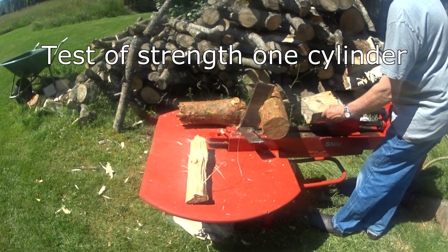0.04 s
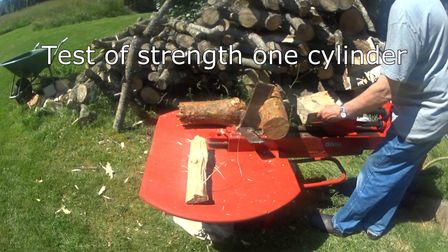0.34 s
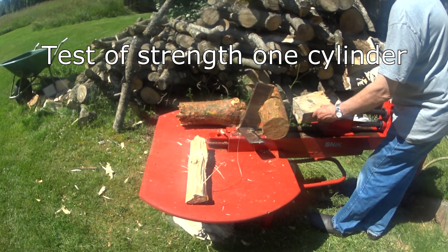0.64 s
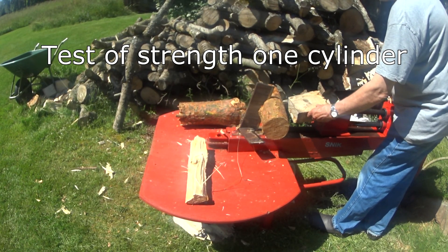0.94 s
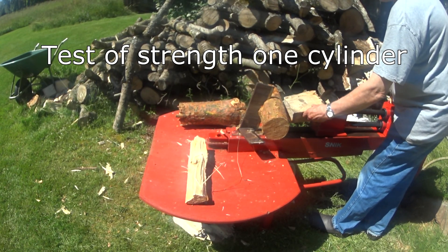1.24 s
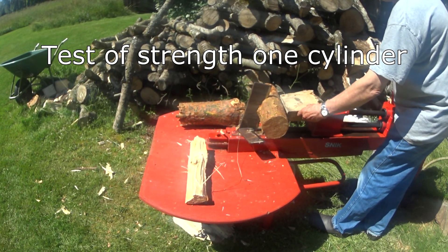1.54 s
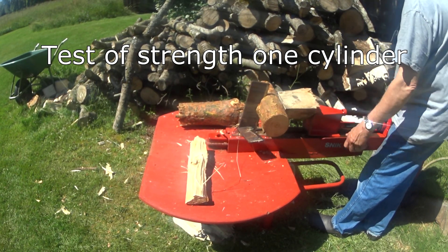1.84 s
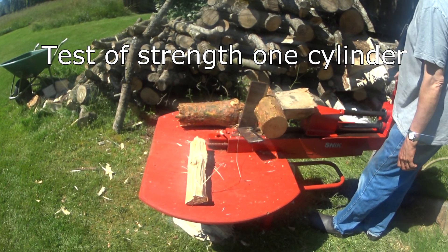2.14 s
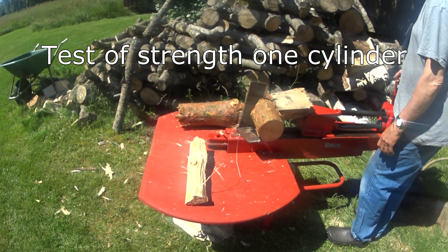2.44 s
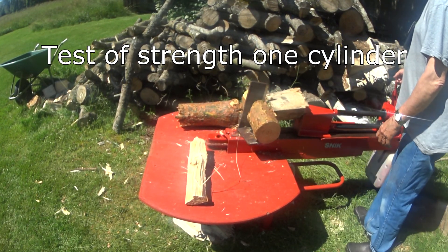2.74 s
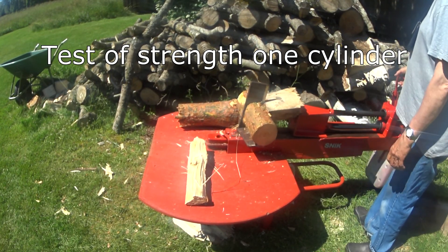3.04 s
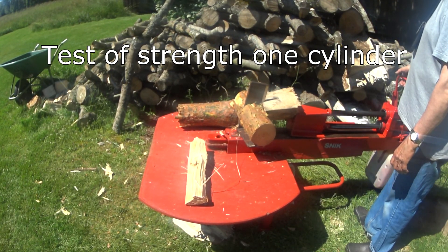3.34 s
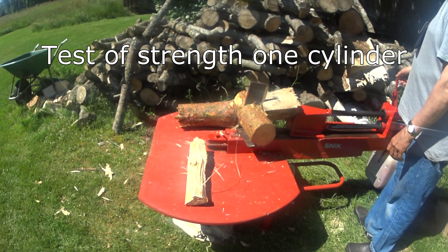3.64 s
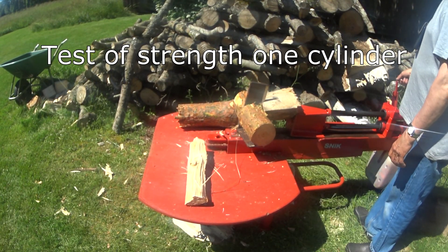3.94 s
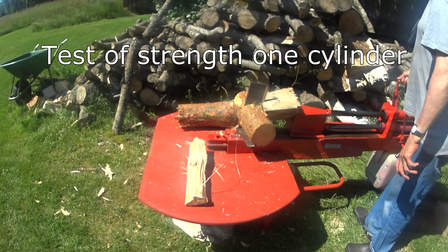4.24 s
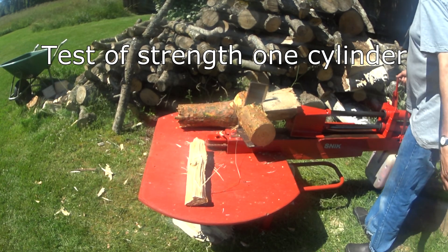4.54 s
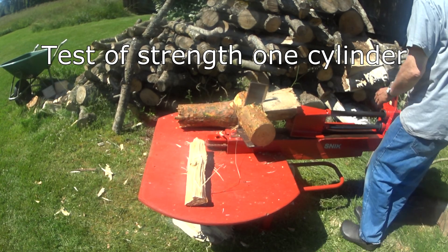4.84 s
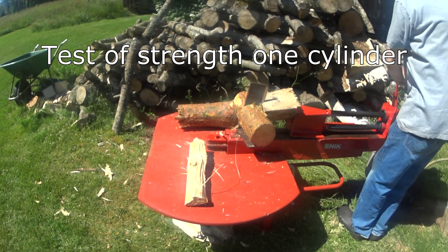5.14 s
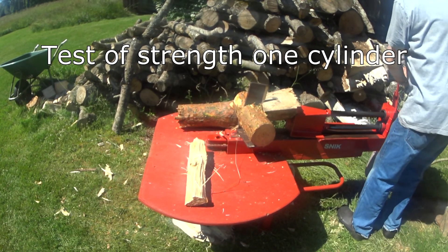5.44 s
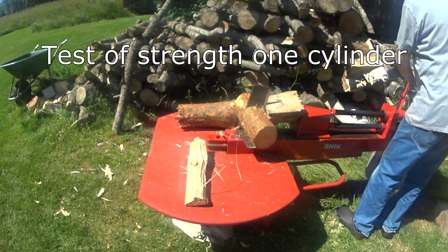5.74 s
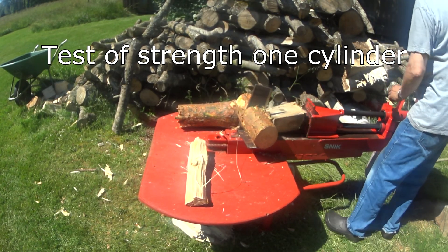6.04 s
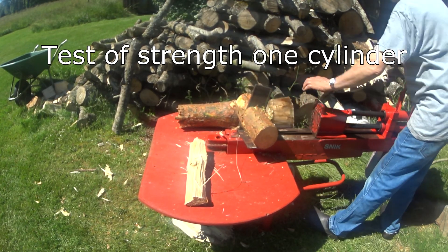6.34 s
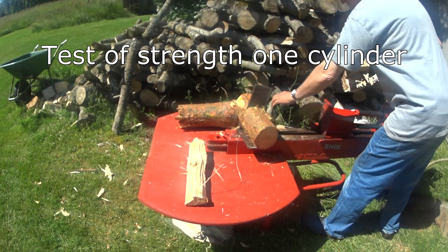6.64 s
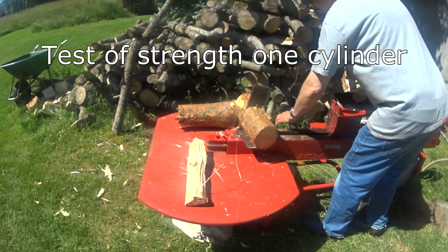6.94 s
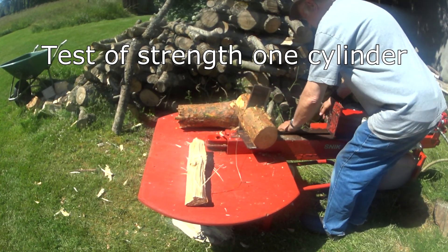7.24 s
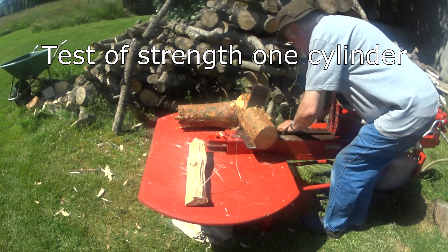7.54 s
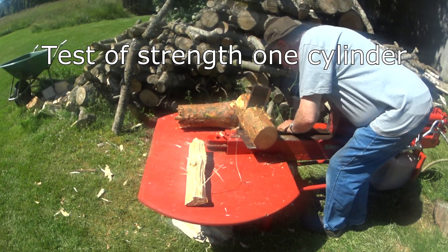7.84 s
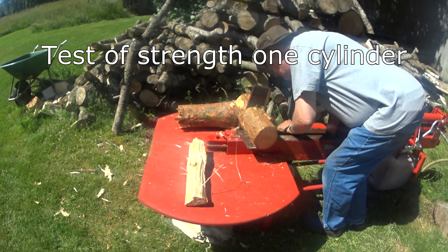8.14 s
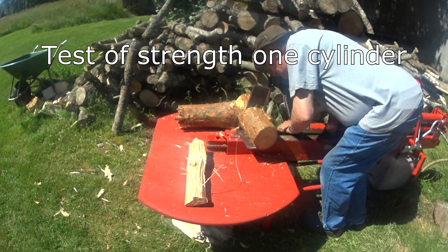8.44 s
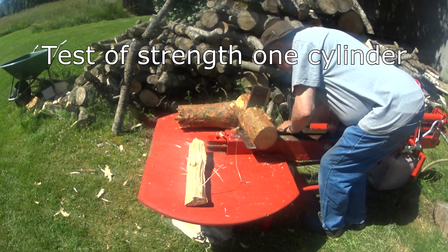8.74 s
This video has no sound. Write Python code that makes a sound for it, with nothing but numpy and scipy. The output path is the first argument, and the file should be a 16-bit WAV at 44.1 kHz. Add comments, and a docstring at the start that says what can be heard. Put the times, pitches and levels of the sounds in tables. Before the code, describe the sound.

A log splitter's motor hums close by in a yard, its valve hissing and whistling. Wood is pressed onto the wedge and its fibres snap in a dense run, then almost stop while the motor labours. The block suddenly cracks open, and the pieces tumble on metal with knocks and one more sharp burst. A stronger hydraulic hiss takes over, with low gusts of wind on the microphone.

```python
"""Hydraulic log splitter on a lawn.

Motor and pump hum; oil hisses and whistles through the valve as the ram pushes a block onto the wedge.
Fibres crackle and tear, the block groans, the ram nearly stalls, then the block bursts open.
The halves tumble on the steel bed and the ram runs back with a louder hiss.
A shoe brushes the grass; wind freshens near the end."""
import sys
import numpy as np
from scipy import signal
from scipy.fft import rfft, irfft, next_fast_len
from scipy.io import wavfile
from scipy.ndimage import map_coordinates

SR = 44100
rng = np.random.default_rng(int(sys.argv[2]) if len(sys.argv) > 2 else 0)


def dump(signal):
    """Clip the signal to [-1, 1] and save it as 16-bit WAV at the path in sys.argv[1]."""
    limited = np.clip(np.atleast_2d(signal).T, -1, 1)
    pcm = np.round(limited * 32767).astype(np.int16)
    wavfile.write(sys.argv[1], SR, pcm)


N = 396900
TIME_S = np.arange(N) / SR
N_FFT = next_fast_len(N + SR // 2, real=True)
FREQS_HZ = np.maximum(np.arange(N_FFT // 2 + 1) * SR / N_FFT, 1)
CONTACT_S, BITE_S, STALL_S, BREAK_S, RETURN_S = 1.613, 2.0, 3.74, 5.7, 7.125

# Levels are relative; spectra are densities.
# loud fractures: t/s, length/s, snap level/dB, body level/dB
FRACTURES = [(1.7565, 0.016, -24.5, -16), (1.826, 0.019, -35, -31), (1.842, 0.024, -34, -16.5),
             (1.864, 0.032, -14.5, -19.5), (1.9, 0.064, -27, -29), (1.9675, 0.014, -19, -18.5),
             (1.9985, 0.0036, -21, -33), (2.033, 0.004, -42, -30.5), (2.072, 0.0015, -24, -29.5),
             (2.131, .002, -33, -35.5), (2.308, .005, -26, -32), (2.3217, 0.0058, -23.5, -29),
             (2.367, 0.0084, -31, -27), (2.395, 0.0098, -24, -35), (2.4855, 0.0085, -26, -29.5),
             (2.531, 0.016, -19, -31.5), (2.556, 0.0054, -21, -30.5), (2.586, .0016, -26.5, -40),
             (2.5965, 0.00092, -22.5, -43), (2.6196, 0.0055, -24, -30), (2.645, 0.016, -25, -32),
             (2.670, 0.013, -19, -24.5), (2.697, 0.005, -29, -34), (2.725, 0.0047, -20, -26.5),
             (2.749, .006, -22, -28), (2.7665, 0.0023, -22.5, -28), (2.7805, 0.006, -18.5, -30),
             (2.8045, 0.0084, -18, -27), (2.8350, 0.006, -19, -22), (2.8614, 0.007, -20, -25),
             (2.888, 0.021, -15, -22.5), (2.9115, 0.012, -19, -27), (2.937, 0.0065, -17.5, -27),
             (2.9967, 0.0053, -22, -24), (3.021, 0.0051, -22, -26.5), (3.0506, 0.004, -27, -25),
             (3.059, 0.0017, -23, -36), (3.082, .003, -25, -28), (3.108, 0.009, -21, -25),
             (3.127, 0.012, -19, -28.5), (3.161, 0.0018, -22, -34), (3.1725, 0.0077, -22, -21),
             (3.1955, 0.0014, -22, -33), (3.2085, 0.0014, -20, -27), (3.218, 0.0028, -24, -27),
             (3.232, 0.0015, -21.5, -31), (3.2625, 0.0016, -24, -32), (3.274, 0.0057, -26, -24),
             (3.311, 0.0031, -20.5, -34), (3.3205, .005, -34, -29), (3.330, .001, -21, -42),
             (3.346, 0.0047, -23, -27), (3.369, .005, -29, -33), (3.3785, 0.0021, -32, -31),
             (3.386, 0.0018, -28, -32), (3.4425, 0.00091, -21.5, -27), (3.4825, 0.0025, -21, -26),
             (3.5296, 0.00093, -30, -46), (3.5708, .001, -35.5, -54), (3.6725, 0.0017, -18, -27),
             (3.7412, 0.0015, -24.5, -35.5), (3.7858, .001, -38, -48), (4.002, 0.0012, -33, -49),
             (4.0527, .001, -43, -55), (4.3946, 0.0011, -33, -40), (4.4867, 0.0016, -31, -41.5),
             (5.4212, 0.0015, -28, -40), (5.591, 0.044, -52, -28.5), (5.624, 0.058, -16, -11),
             (5.648, 0.047, -13, -15), (5.692, 0.0018, -20.5, -28), (5.70, 0.12, -23.5, -23),
             (5.731, 0.0023, -25, -31), (5.80, .002, -27, -36), (6.004, 0.0033, -22, -21.5),
             (6.010, .001, -31, -27), (6.23, 0.0021, -27.5, -34), (6.766, 0.05, -11, -15.5),
             (6.796, 0.052, -16.5, -19.5), (7.073, 0.007, -25, -23.5)]
# fracture spectra of fibres, block and frame: f/Hz, level/dB
SNAP_SPECTRUM = [(1200, -43), (2500, -5.5), (4000, 5), (5500, 4), (8500, 4.5), (11000, 1.5), (14000, -4.5),
                 (16000, -28)]
BODY_SPECTRUM = [(250, -31.5), (550, 2.5), (900, 5.5), (1200, 9.5), (1700, 8.5), (2300, 7), (3500, 4.5),
                 (8000, -16.5)]
THUD_SPECTRUM = [(40, -28), (100, -13), (150, -1), (240, 0), (320, -1.5), (450, -3), (700, -3.5),
                 (2000, -46)]
# block resonances: f/Hz, width/Hz, lift/dB
BLOCK_PEAKS = [(600, 95, 13), (942, 200, 8.5), (1483, 29, 4.5), (1677, 100, 5.5), (1976, 55, 5),
               (2400, 200, 4), (3530, 140, 6)]
# small fibres giving way: t/s, level/dB
CRACKLE_ENVELOPE = [(2.0, -31.5), (2.096, -32.5), (2.2, -29.5), (2.342, -32), (2.5, -31), (2.6, -38.5),
                    (3.0, -32.5), (3.1, -24.5), (3.22, -28.5), (3.35, -29), (3.478, -37), (3.58, -48)]
# single splinters: t/s, level/dB, f/Hz
SPLINTERS = [(2.0378, -1, 9000), (2.0504, -5, 10000), (2.0682, -2, 9500), (2.19, -13, 8000),
             (2.2153, -8, 8500), (2.2545, -11, 9000), (2.4045, -10, 10000), (2.4157, -5, 11000),
             (2.5255, -12, 7500), (2.5443, -4, 11000), (2.7674, -4, 6000), (2.9145, -9, 8500),
             (2.9385, -8, 8000), (3.054, -9, 8000), (3.2455, -11, 8500), (3.2575, -10, 7500),
             (3.4215, -1, 9000), (3.4429, -4, 7000)]
# block lurching on the wedge; wood springing off it: t/s, level/dB
LURCHES = [(2.325, -35), (2.56, -34), (2.713, -33), (2.745, -29), (2.777, -27), (2.842, -25), (2.89, -31),
           (2.93, -27), (2.955, -31), (2.999, -24), (3.11, -30.5), (3.35, -32.5)]
WEDGE_HITS = [(1.869, -12), (6.8, -11)]
# wood on the bed: t/s, low level/dB, mid level/dB, upper level/dB
KNOCKS = [(1.526, -27, -23.5, -23.5), (1.568, -30, -23, -29.5), (1.613, -32, -29.5, -30.5),
          (1.843, -25, -27, -21.5), (1.855, -26, -26, -23), (1.884, -25.5, -47, -27.5),
          (5.729, -40, -26, -29), (5.742, -35, -20, -28.5), (5.756, -26, -25, -34),
          (5.819, -24.5, -21, -30), (6.004, -22.5, -25, -32), (6.019, -19, -26, -35),
          (6.466, -26, -29, -21.5), (6.475, -20, -19.5, -33), (6.492, -24, -28, -37),
          (6.508, -18, -29.5, -31), (6.536, -23.5, -35, -35), (6.828, -42, -24, -34),
          (6.849, -26, -21, -19.5), (6.862, -23.5, -23, -26), (6.878, -29.5, -29, -36),
          (7.074, -22, -18.5, -23)]
# modes of block, wedge, and block on bed (low, mid, upper sets): f/Hz, level/dB, t60/s
LURCH_MODES = [(119.4, 1, 0.16), (139.4, 3.5, 0.24), (229, 5, 0.19), (294, -3, 0.12), (339, 3, 0.11),
               (418, -6, .1), (624, -2.5, 0.14)]
WEDGE_MODES = [(3424, -14.5, .14), (4575, -9, .08), (5820, -10, .07), (7825, -7, .09), (9450, -10, .06),
               (11025, -6, .1), (11410, -6, .08), (12090, -8, .09)]
BED_MODE_SETS = [
    [(134, -3, 0.12), (172, 3, 0.16), (206, -14, 0.11), (244.5, 6.5, 0.19), (335, -0.5, 0.089)],
    [(407.7, 5.5, 0.13), (459, -1, 0.092), (505, 0, 0.15), (607, 12.5, 0.076), (683, 5.5, 0.092)],
    [(772, 6, 0.061), (880, 7, 0.089), (973, 8.5, 0.057), (1123, 0.5, 0.094), (1266, 6.5, 0.039),
     (1418, 7, 0.036), (1670, -2, 0.033)],
]
# fibre crackle, rubbing wood, bark clatter: f/Hz, level/dB
CRACKLE_SPECTRUM = [(300, -10), (700, 7), (2000, -8), (4500, -3.5), (8500, 3), (12000, -.5), (16000, -5)]
GROAN_SPECTRUM = [(60, -18), (105, -16), (135, 13), (180, -10.5), (230, 4), (340, -12), (470, -9.5),
                  (620, -11.5), (1200, -13.5), (4000, -38)]
BARK_SPECTRUM = [(60, -36), (200, 11.5), (900, -3.5), (1500, -2.5), (2500, -13), (5000, -14.5),
                 (15000, -41)]

# oil flow through the valve: t/s, low level/dB, mid level/dB, treble level/dB
ADVANCE_ENVELOPES = [(0.0, -37, -34.5, -41), (0.058, -30.5, -35.5, -40.5), (0.136, -36, -36, -39.5),
                     (0.638, -35.5, -34.5, -40.5), (1.39, -47, -36, -43), (1.482, -37, -36, -43.5),
                     (1.5, -45, -37, -44)]
RETURN_ENVELOPES = [(7.16, -33.5, -27, -33.5), (8.774, -31.5, -25.5, -28), (8.95, -32, -26, -29.5)]
# hiss of each flow: f/Hz, level/dB
ADVANCE_SPECTRUM = [(100, -25), (250, -25), (420, -18.5), (1000, -16), (2000, -2), (3000, 6), (5000, -2.5),
                    (7500, 3), (10500, 0), (12500, 4.5), (14200, -1), (16000, -67)]
COAST_SPECTRUM = [(100, -1), (250, -2), (420, 0), (1000, 0), (2000, -3), (3000, -9.5), (5000, -4),
                  (7500, -9), (10500, -10.5), (12500, -13), (14200, -20), (16000, -33)]
RETURN_SPECTRUM = [(100, -7.5), (250, -6), (420, -15.5), (1000, -7), (2000, -18.5), (3000, -18.5),
                   (5000, 1.5), (7500, -16), (10500, -15), (12500, -26.5), (14200, -29), (16000, -50)]
# valve, hose and cylinder resonances: f/Hz, width/Hz, lift/dB
ADVANCE_PEAKS = [(410, 35, 4), (577, 174, 15.5), (664, 150, 21.5), (703, 30, 8.5), (758, 65, 19),
                 (820, 40, -6), (875, 44, 12.5), (919, 180, 29), (1204, 280, 18), (1527, 64, 18.5),
                 (1700, 173, 16.5), (2160, 56, 11.5), (2250, 570, 7), (3340, 77, 12.5), (3800, 84, 3.5),
                 (4240, 95, 9), (4640, 300, 2.5), (5300, 120, 6), (5740, 340, 7.5), (7000, 300, 4),
                 (8330, 120, 10), (8940, 200, 6.5), (9930, 330, 8)]
COAST_PEAKS = [(882, 37, 12), (1698, 170, 7.5), (2160, 150, 4.5), (2400, 170, 6.4), (2834, 280, 7),
               (3330, 82, 9.6), (3940, 200, 5), (4260, 88, 9), (4760, 86, 7.5), (5540, 160, 7.9),
               (7070, 260, 6.8), (8850, 400, 3), (9550, 250, 6)]
RETURN_PEAKS = [(412, 19, 9), (472, 45, 12.5), (545, 25, 13.5), (642, 62, 9), (735, 63, 9.5),
                (884, 190, 9.5), (1180, 50, 3.5), (1444, 83, 13), (1682, 357, 16.5), (1850, 67, 9),
                (2020, 54, 11), (2183, 274, 16), (2553, 370, 13), (2930, 230, 11.5), (3385, 215, 12),
                (3715, 100, 7), (4605, 150, 6), (4800, 114, 8), (4930, 65, -10), (5000, 110, 2.5),
                (5320, 80, -7), (5500, 80, 3), (6170, 120, -5), (6500, 200, 4.5), (7530, 200, 9),
                (8130, 350, 3), (8900, 250, -3), (9530, 700, 4)]
# valve whistles: start/s, end/s, top f/Hz, pitch drop at both ends/fraction, width/Hz, level/dB
WHISTLES = [(0, .22, 2270, .02, 110, -44), (.48, 1.56, 4570, 0.04, 90, -47),
            (0.561, 1.415, 2202, 0.03, 78.8, -44), (.56, .82, 3210, .01, 49.8, -47),
            (.85, 1.5, 3396, 0.01, 70, -47), (4.25, 4.323, 4350, .045, 200, -58),
            (5.675, 5.805, 4720, .015, 479, -33), (6.1, 7.109, 4680, .045, 170, -46.5),
            (6.25, 6.74, 2160, .03, 150, -39), (7.151, 8.35, 4760, 0, 220, -36)]

# motor speed: t/s, f/Hz
MOTOR_SPEED = [(0, 24.55), (1.5, 24.6), (2.1, 26), (2.45, 21.8), (3.2, 20.3), (3.6, 23.8), (4.4, 23),
               (5.55, 23.0), (5.9, 29), (7.1, 21.4), (9, 30)]
# pump load: t/s, load/fraction
PUMP_LOAD = [(0, 0), (1.5, 0.16), (1.85, 0.6), (2.3, 0.7), (3.8, 0.74), (4.3, 0.8), (5.6, 1), (5.9, 0.3),
             (9, 0.4)]
# motor and pump hum: harmonic number, level/dB
FREE_HARMONICS = [(2, -12), (3, -4), (4, -9), (5, -12), (6, 7), (7, -2), (9, 1), (10, -5), (12, 3),
                  (14, -7), (15, 2.5), (17, 0), (18, -7), (21, -8), (29, 5)]
LOADED_HARMONICS = [(2, -13), (3, -6), (6, 3.5), (7, -6), (8, -15), (9, -9), (10, -14), (11, -10), (12, -9),
                    (13, 0.5), (15, -13), (16, -8), (17, -14), (18, -6), (19, -11), (20, -17), (21, -14),
                    (24, -6), (27, -17), (28, -14), (29, -17), (30, -14), (33, -7.5), (34, -13), (37, -9.5)]
# rush of motor and yard: f/Hz, level/dB
RUSH_SPECTRUM = [(18, -40), (30, 0), (90, -40), (141, -1), (245, -21), (295, -7), (499, -6), (554, -3.5),
                 (780, -4.5), (962, -8), (1460, -14), (2060, -13.5), (2750, -15), (9220, -16.5),
                 (16000, -30.5)]
# pump housing resonances: f/Hz, width/Hz, lift/dB
HOUSING_PEAKS = [(836, 60, 4), (1480, 100, 13), (1720, 130, 8.5), (1860, 53, 5), (2590, 220, 7),
                 (2790, 96, 6)]

# shoe on grass, breeze, gust peaks: t/s, level/dB
GRASS_ENVELOPE = [(4.75, -84), (4.88, -48.5), (5.0, -40), (5.04, -42.5), (5.1, -90)]
BREEZE_ENVELOPE = [(0, -54), (.6, -50), (1.1, -85), (3.9, -63), (4.3, -59), (6.2, -57), (6.33, -41.5),
                   (9, -39.5)]
GUSTS = [(4.18, -53), (4.85, -54), (6.33, -37), (6.93, -37), (7.3, -36.5), (7.4, -28), (7.5, -30.5),
         (7.7, -33), (8.01, -32.5), (8.12, -28.5), (8.34, -31), (8.46, -27.5), (8.68, -32), (8.76, -30.5)]
# grass, wind, wind's side-to-mid ratio: f/Hz, level/dB
GRASS_SPECTRUM = [(1500, -14), (5000, -7.5), (10000, .5), (13000, -5), (16000, -16)]
WIND_SPECTRUM = [(20, -8), (40, -3.5), (75, 1.5), (140, 1), (220, -4.5), (320, -13), (600, -34),
                 (2000, -70)]
WIND_SIDE = [(35, -12), (130, -6), (300, 2)]

# stereo balance: f/Hz, left minus right/dB
BLOCK_BALANCE = [(60, -2), (380, -4.5), (700, -3.5), (1300, -1.5), (4400, -.2), (15000, -1.3)]
BED_BALANCE = [(60, -3), (200, -6), (700, -5), (2400, -2.5), (15000, -1.5)]
MACHINE_BALANCE = [(60, -1), (150, -4.3), (300, -4.5), (700, -4.8), (1300, -2.6), (2400, -2.4),
                   (4400, -1.3), (8000, -2.8), (15000, -2.3)]
# left channel's phase lead: f/Hz, phase/rad
MACHINE_LEAD = [(0, 0), (2070, 0.27), (2930, 0.64), (3880, 0.14), (11400, -0.78), (16200, -1.2)]


def fractures(grain_db, tail_s, thud_tail_s):
    """Avalanches of fibre snaps shake block and frame; longer ones snap lower and thud harder."""
    t = np.arange(SR // 7) / SR
    trains = np.zeros((3, N))
    for start_s, length_s, snap_db, body_db in [*FRACTURES, *stick_slip(rate_hz=37, spread_db=2.5)]:
        doublings = np.log2(length_s / .0053)  # against the usual length
        snap_hz = 6860 * 2 ** (-.053 * doublings + rng.uniform(-.6, .6))
        thud_db = body_db - 8.5 + 1.54 * doublings
        grains = from_db(grain_db * np.repeat(rng.standard_normal(len(t)), 16)[:len(t)])
        tails_s = np.array([[tail_s], [2 * tail_s], [thud_tail_s]]) + .35 * length_s
        attack = 1 - np.exp(-(t + 1 / SR) / (.031 * length_s))  # long tears gather pace
        decay = np.exp(-np.maximum(t - .53 * length_s, 0) / tails_s)
        bursts = rng.standard_normal((3, len(t))) * grains * attack * decay
        bursts[0] += .9 * fibre(bursts[0], snap_hz, q=2.5)
        for train, db, burst in zip(trains, (snap_db, body_db, thud_db), bursts):
            add(train, start_s, from_db(db) * burst * np.sqrt(.01 * SR / np.sum(burst ** 2)))
    snap = colour(trains[0], spectrum(SNAP_SPECTRUM))
    body = colour(trains[1], spectrum(BODY_SPECTRUM, BLOCK_PEAKS))
    thud = colour(trains[2], spectrum(THUD_SPECTRUM))
    return from_db(-2) * snap + body + thud


def stick_slip(rate_hz, spread_db):
    """The wedge sticks and slips unevenly: lesser fractures, rows as in FRACTURES."""
    gap, softness, size = rng.uniform(-1, 1, (120, 3)).T
    times_s = BITE_S + np.cumsum(1 + .8 * gap) / rate_hz
    snap_db = 20 * np.log10(np.interp(times_s, TIME_S, crackle_gain())) - 2 - spread_db * softness
    rows = np.transpose([times_s, .00062 * 4 ** size, snap_db, snap_db - 9.5])
    return rows[times_s < STALL_S + .5]


def crackle(rate_hz, spread_db):
    """Single fibres of many pitches tick between the fractures."""
    ticks = (rng.random(N) < rate_hz / SR) * rng.choice([-1, 1], N)
    ticks = ticks * from_db(spread_db * np.minimum(rng.exponential(1, N), 5))
    pitches_hz = np.geomspace(2000, 13000, 9)
    pitch_index = rng.integers(0, len(pitches_hz), N)
    snaps = sum(fibre(ticks * (pitch_index == k), hz, q=3.5) for k, hz in enumerate(pitches_hz))
    snaps = unit_rms(colour(snaps, spectrum(CRACKLE_SPECTRUM)))
    return crackle_gain() * from_db(-.5 + 2.8 * drift(51)) * snaps


def crackle_gain():
    """Crackle sets in as the wedge bites, fades as the ram stalls."""
    gate = swell(BITE_S, STALL_S, rise_db_per_s=205, fall_db_per_s=47)
    return from_db(envelopes(CRACKLE_ENVELOPE)[0]) * gate


def splinters(q):
    """Each stiff splinter breaks with one short, bright click."""
    out, impulse = np.zeros(N), signal.unit_impulse(SR // 100)
    bandpass = signal.butter(2, [3000, 14500], "band", fs=SR, output="sos")
    for start_s, db, hz in SPLINTERS:
        click = signal.sosfilt(bandpass, fibre(impulse, hz, q))
        add(out, start_s, from_db(db) * click / np.max(np.abs(click)))
    return out


def fibre(x, hz, q):
    """A fibre rings briefly at its own pitch."""
    return signal.lfilter(*signal.iirpeak(hz, q, fs=SR), x + 1e-18)


def groan(level_db, rough_db):
    """The block rubs on the wedge, most when it is deepest in sound wood; lurches ring low modes."""
    pressing = swell(2.62, 3.06, rise_db_per_s=15.5, fall_db_per_s=37) * flow_gate(BITE_S, BREAK_S)
    rubbing = colour(rng.standard_normal(N), spectrum(GROAN_SPECTRUM))
    out = from_db(level_db + rough_db * drift(34.9)) * pressing * rubbing
    highpass = signal.butter(2, 110, "high", fs=SR, output="sos")
    for start_s, db in LURCHES:
        lurch = signal.sosfilt(highpass, ring(LURCH_MODES, detune=.04))
        add(out, start_s, from_db(db) * unit_onset(lurch))
    return out


def knocks(clatter_db, clatter_s):
    """Each blow rings block and bed; rough bark adds a short clatter."""
    out, bark = np.zeros((2, N))
    t = np.arange(SR // 4) / SR
    for start_s, *levels_db in KNOCKS:
        for modes, db in zip(BED_MODE_SETS, levels_db):
            add(out, start_s, from_db(db - .3) * unit_onset(ring(modes, detune=.035)))
        clatter = rng.standard_normal(len(t)) * np.exp(-t / clatter_s)
        add(bark, start_s, from_db(levels_db[2] + clatter_db) * clatter)
    return out + colour(bark, spectrum(BARK_SPECTRUM))


def wedge(scrape_s):
    """Wood scraping off the wedge rings the steel roughly."""
    t = np.arange(SR // 4) / SR
    out = np.zeros(N)
    for start_s, db in WEDGE_HITS:
        scrape = rng.standard_normal(len(t)) * np.exp(-t / scrape_s)
        scrape /= np.sqrt(np.sum(scrape ** 2))
        add(out, start_s, from_db(db) * signal.fftconvolve(scrape, ring(WEDGE_MODES, detune=0)))
    return out


def ring(modes, detune):
    """One blow on damped modes; the contact point varies their strength and pitch."""
    t = np.arange(SR // 3) / SR
    hz, db, t60_s = np.transpose(modes)[:, :, None]
    strength, phase, shift = rng.standard_normal((3, len(modes), 1))
    waves = np.sin(2 * np.pi * (hz * (1 + detune * shift) * t + phase))
    decay = np.exp(-np.log(1000) * t / t60_s)
    attack = 1 - np.exp(-t / .0018)
    return np.sum(from_db(db + 2 * strength) * waves * decay, axis=0) * attack


def oil(shaft_rad, ripple, flutter_db, rasp_db):
    """Turbulent oil rings valve and lines; pump strokes ripple the flow."""
    lines_db = standing_waves(spread_db=2.6, spacing_hz=50)
    advance_db = spectrum(ADVANCE_SPECTRUM, ADVANCE_PEAKS) + lines_db
    advance = banded_hiss(ADVANCE_ENVELOPES, advance_db, edges_hz=(1200, 5000), side_db=-20)
    advance = waver(advance, depth=.003) * flow_gate(0, CONTACT_S)
    advance *= unit_rms(from_db(rasp_db * drift(160)))
    coast = noise(spectrum(COAST_SPECTRUM, COAST_PEAKS) + lines_db, side_db=-16)
    coast = from_db(-32.5) * waver(coast, depth=.006) * flow_gate(BREAK_S, RETURN_S)
    back_db = spectrum(RETURN_SPECTRUM, RETURN_PEAKS) + .5 * lines_db
    back = banded_hiss(RETURN_ENVELOPES, back_db, edges_hz=(1200, 7000), side_db=-14)
    back *= flow_gate(RETURN_S, N / SR)
    flow = advance + coast + back + valve_whistle(wander=.012, rough_db=3)
    strokes = np.cos(shaft_rad) + np.cos(3 * shaft_rad) + np.cos(6 * shaft_rad)
    return flow * (1 + ripple * strokes) * from_db(flutter_db * drift(30))


def banded_hiss(levels, spectrum_db, edges_hz, side_db):
    """Hiss whose low, mid and treble bands swell separately."""
    low, low_and_mid = [1 / (1 + (FREQS_HZ / hz) ** 10) for hz in edges_hz]
    bands = low, np.abs(low_and_mid - low), 1 - low_and_mid
    return sum(from_db(db) * noise(spectrum_db, side_db, np.sqrt(band))
               for db, band in zip(envelopes(levels), bands))


def standing_waves(spread_db, spacing_hz):
    """Small treble modes of the oil lines: an uneven spectral ripple in dB."""
    knots = rng.standard_normal(1000)
    ripple_db = spread_db * np.interp(FREQS_HZ / spacing_hz, np.arange(len(knots)), knots)
    return ripple_db / (1 + (3500 / FREQS_HZ) ** 4)


def valve_whistle(wander, rough_db):
    """Oil sings at the valve's edge, blurred by fast pitch jitter."""
    unsteady, out = 1 + wander * drift(16), 0
    for start_s, end_s, top_hz, drop, width_hz, db in WHISTLES:
        arch = 1 - drop * np.interp(TIME_S, [start_s, end_s], [-1, 1]) ** 2
        hz = top_hz * unsteady * arch + .5 * width_hz * drift(2 * width_hz)
        tone = from_db(rough_db * drift(200)) * np.cos(2 * np.pi * np.cumsum(hz) / SR)
        out += from_db(db) * flow_gate(start_s, end_s) * unit_rms(tone)
    return out


def flow_gate(start_s, end_s):
    """Gain of an oil flow building up and dying away."""
    return swell(start_s, end_s, rise_db_per_s=355, fall_db_per_s=268)


def motor(free_db, loaded_db, wobble):
    """Shaft harmonics; load crossfades free and loaded hum. Returns hum and shaft angle."""
    speed_hz = envelopes(MOTOR_SPEED)[0] * (1 + wobble * drift(14))
    load = envelopes(PUMP_LOAD)[0]
    shaft_rad = 2 * np.pi * np.cumsum(speed_hz) / SR
    turn_rad = np.linspace(0, 2 * np.pi, 2048)
    phases_rad = rng.uniform(0, 2 * np.pi, 64)
    hum = np.zeros(N)
    for harmonics, gain in ((FREE_HARMONICS, from_db(free_db) * (1 - load)),
                            (LOADED_HARMONICS, from_db(loaded_db) * load)):
        cycle = sum(from_db(db) * np.sin(k * turn_rad + phases_rad[k]) for k, db in harmonics)
        hum += gain * np.interp(shaft_rad % (2 * np.pi), turn_rad, unit_rms(cycle))
    return hum * from_db(.8 * drift(11)), shaft_rad


def rush(level_db):
    """Steady noise of motor and yard, with pump housing resonances."""
    channel_db = np.array([[-1.3], [1.2]])
    return from_db(level_db + channel_db) * noise(spectrum(RUSH_SPECTRUM, HOUSING_PEAKS), side_db=-6.5)


def shoe_on_grass(rough_db):
    """A shoe brushes the grass: one bright swish."""
    gain = from_db(envelopes(GRASS_ENVELOPE)[0] + rough_db * drift(52))
    return gain * noise(spectrum(GRASS_SPECTRUM), side_db=-12)


def wind(gain_db, buffet_db):
    """Low buffeting from a breeze with short gusts."""
    gusts = [from_db(db) * swell(s, s, rise_db_per_s=220, fall_db_per_s=140) for s, db in GUSTS]
    force = np.max([from_db(envelopes(BREEZE_ENVELOPE)[0]), *gusts], axis=0)
    force *= from_db(gain_db + buffet_db * drift(18))
    return force * noise(spectrum(WIND_SPECTRUM), side_db=spectrum(WIND_SIDE))


def yard_echo(x, echo_db, t60_s):
    """Woodpile and machine scatter a short dull tail, different in each ear."""
    t = np.arange(SR // 3) / SR
    tail = rng.standard_normal((2, len(t))) * np.exp(-np.log(1000) * t / t60_s) * (t > .003)
    tail = signal.lfilter([.55], [1, -.45], tail)
    tail /= np.sqrt(np.sum(tail[0] ** 2))
    return x + from_db(echo_db) * filtered(x, rfft(tail, N_FFT))


def place(x, balance, lead_rad=0):
    """Pan by level and phase, per frequency."""
    right = from_db(-spectrum(balance))
    ears = 2 * np.array([np.ones_like(right), right * np.exp(-1j * lead_rad)]) / (1 + right)
    return filtered(x, ears)


def waver(x, depth):
    """All resonances wander in pitch together, by the fraction depth."""
    position = np.arange(N) + np.cumsum(depth * drift(12))
    return np.array([map_coordinates(channel, [position], order=3, mode="mirror") for channel in x])


def noise(spectrum_db, side_db, weights=1):
    """Shaped mid/side stereo noise, rms 1."""
    real, imaginary = rng.standard_normal((2, 2, len(FREQS_HZ)))
    mid, side = (real + 1j * imaginary) * from_db(spectrum_db) * weights
    return unit_rms(irfft(mid + from_db(side_db) * side * [[1], [-1]], N_FFT)[:, :N])


def colour(x, spectrum_db):
    """Minimum-phase filter; keeps the power of white noise."""
    cepstrum = irfft(np.log(unit_rms(from_db(spectrum_db))), N_FFT)
    cepstrum[1:N_FFT // 2] *= 2
    cepstrum[N_FFT // 2 + 1:] = 0
    return filtered(x, np.exp(rfft(cepstrum)))


def filtered(x, response):
    """Apply a complex frequency response."""
    return irfft(rfft(x, N_FFT) * response, N_FFT)[..., :N]


def spectrum(points, peaks=()):
    """Curve over log frequency plus resonance peaks."""
    hz, values = np.transpose(points)
    lifts_db = sum(db / (1 + (2 * (FREQS_HZ - f) / width) ** 2) for f, width, db in peaks)
    return np.interp(np.log(FREQS_HZ), np.log(hz), values) + lifts_db


def envelopes(rows):
    """Each value column at every sample."""
    times_s, *columns = np.transpose(rows)
    return [np.interp(TIME_S, times_s, column) for column in columns]


def swell(start_s, end_s, rise_db_per_s, fall_db_per_s):
    """Gain: reaches 1 at start_s, holds to end_s, decays."""
    before_db = rise_db_per_s * np.maximum(start_s - TIME_S, 0)
    after_db = fall_db_per_s * np.maximum(TIME_S - end_s, 0)
    return from_db(-np.minimum(before_db + after_db, 200))


def drift(rate_hz):
    """Random wander, rms 1."""
    knots = rng.standard_normal(16000)
    return unit_rms(np.interp(TIME_S * rate_hz, np.arange(len(knots)), knots))


def add(out, start_s, sound):
    """Mix in at start_s."""
    at = int(start_s * SR)
    out[at:at + len(sound)] += sound[:N - at]


def unit_onset(x):
    """Scale the first 30 ms to a spread of 1."""
    return x / np.std(x[:SR * 3 // 100])


def unit_rms(x):
    """Scale to rms 1."""
    return x / np.sqrt(np.mean(x ** 2) + 1e-20)


def from_db(db):
    """Decibels to gain."""
    return 10 ** (np.asarray(db) / 20)


def scene():
    """Splitter slightly to the right, over rush, grass and wind."""
    hum, shaft_rad = motor(free_db=-49.5, loaded_db=-43, wobble=.00307)
    background = rush(level_db=-47) + shoe_on_grass(rough_db=2.6) + wind(gain_db=3.5, buffet_db=3.5)
    hiss = oil(shaft_rad, ripple=.071, flutter_db=.5, rasp_db=.7)
    steel = knocks(clatter_db=1.5, clatter_s=.023) + wedge(scrape_s=.034)
    wood = crackle(rate_hz=4500, spread_db=4.5) + fractures(grain_db=4, tail_s=.0023, thud_tail_s=.039)
    wood += splinters(q=2.7) + groan(level_db=-34, rough_db=3.5)
    machine = place(hum + hiss, MACHINE_BALANCE, lead_rad=spectrum(MACHINE_LEAD))
    bed = place(yard_echo(steel, echo_db=-18.5, t60_s=.22), BED_BALANCE)
    block = place(yard_echo(wood, echo_db=-20.5, t60_s=.32), BLOCK_BALANCE)
    return block + bed + machine + background


def record(dry):
    """Soft clip, then low-pass."""
    ceiling, cutoff_hz = .6, 16000
    lowpass = signal.ellip(10, .1, 80, cutoff_hz, fs=SR, output="sos")
    return signal.sosfilt(lowpass, ceiling * np.tanh(dry / ceiling))


dry = scene()
out = record(dry)
dump(out)
```